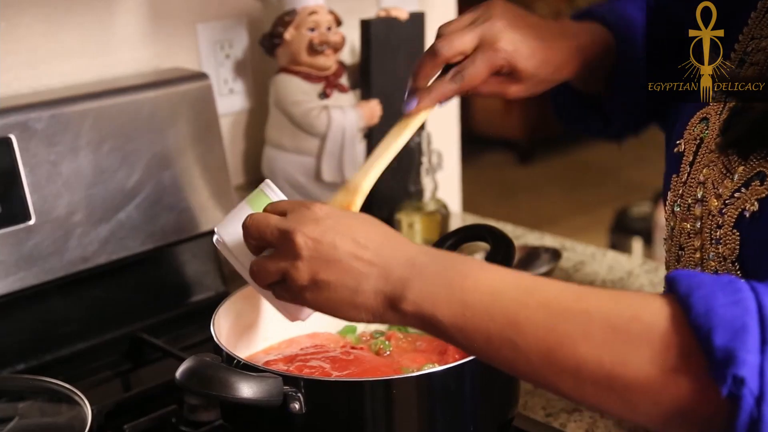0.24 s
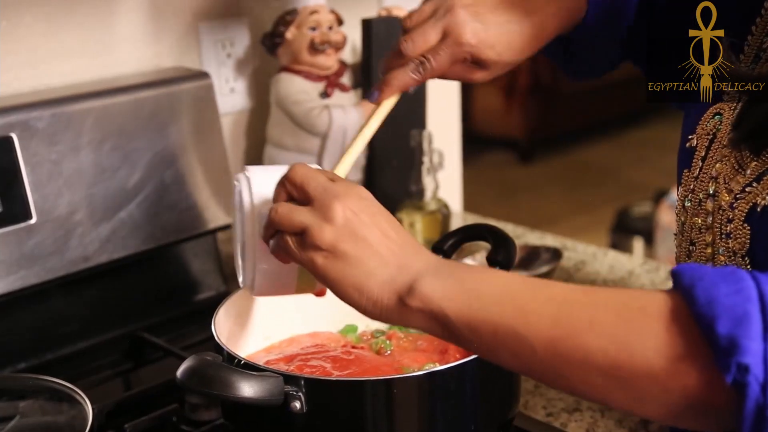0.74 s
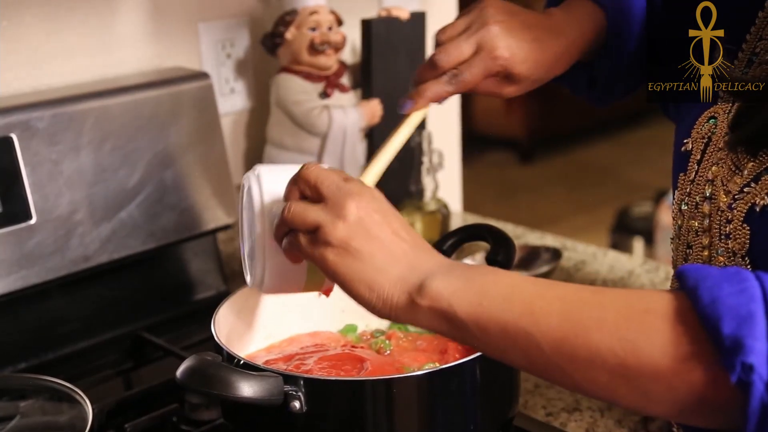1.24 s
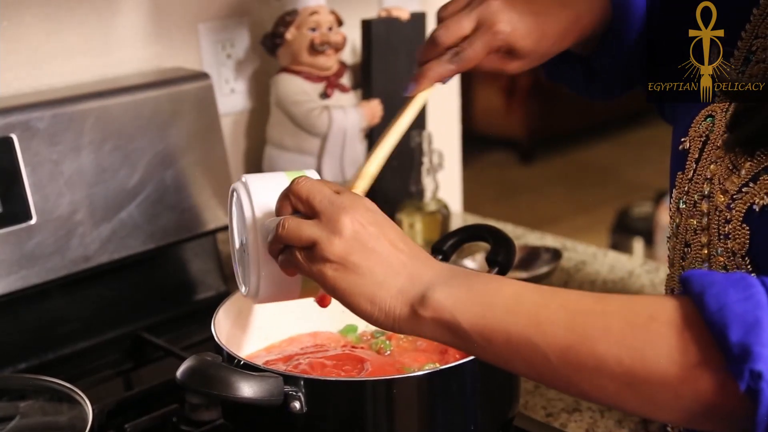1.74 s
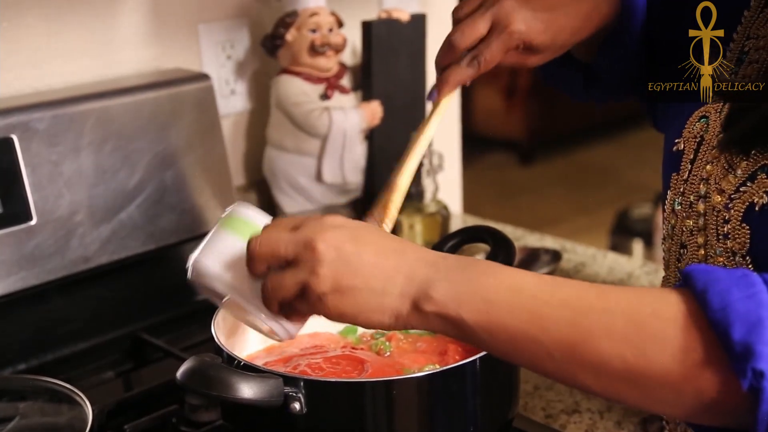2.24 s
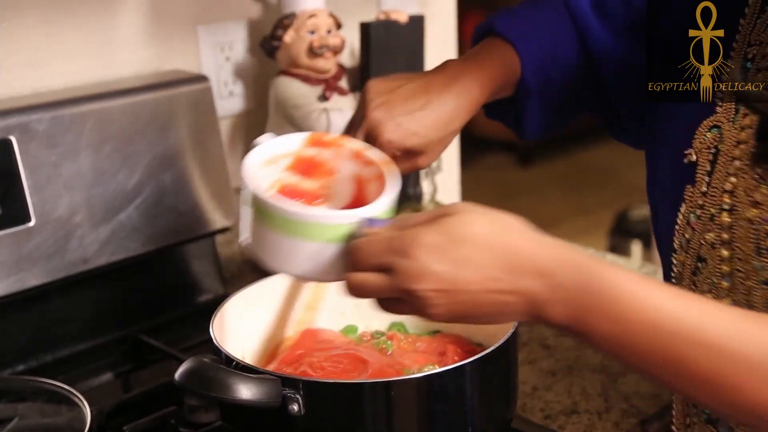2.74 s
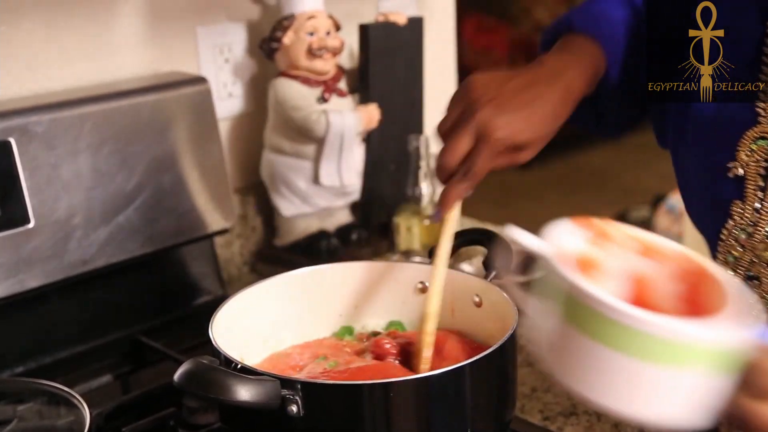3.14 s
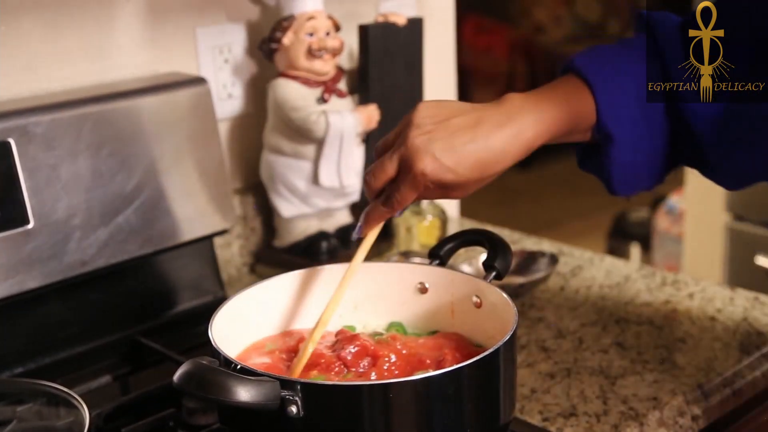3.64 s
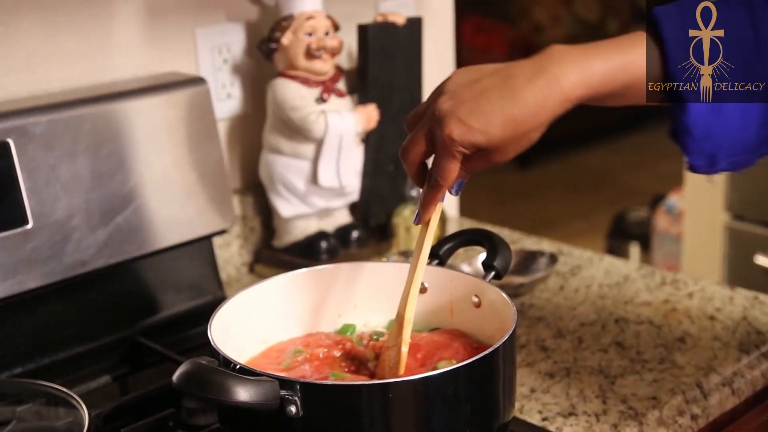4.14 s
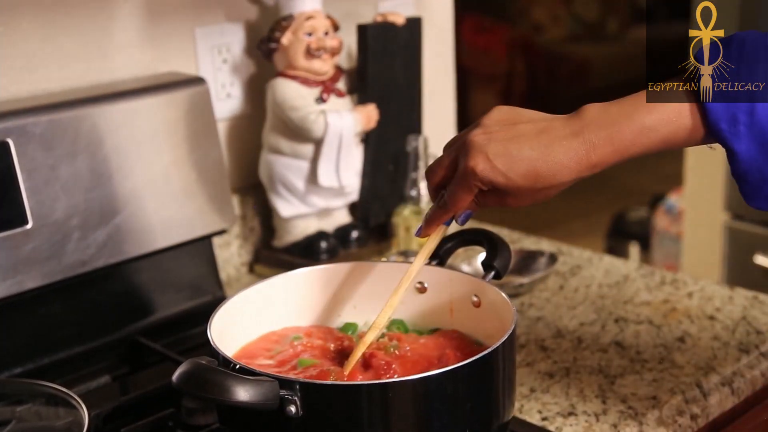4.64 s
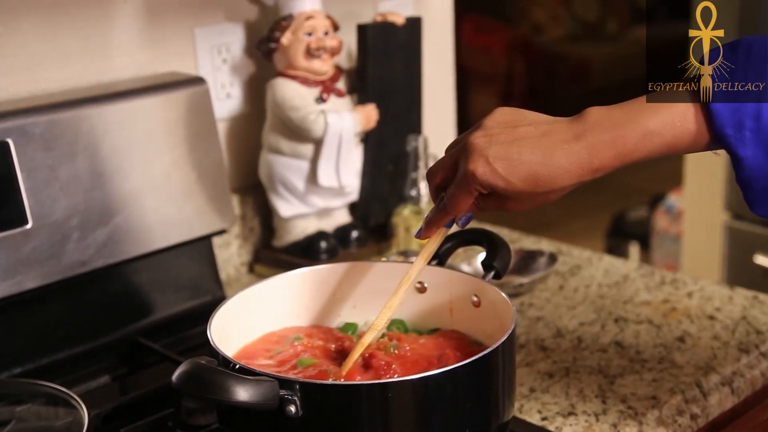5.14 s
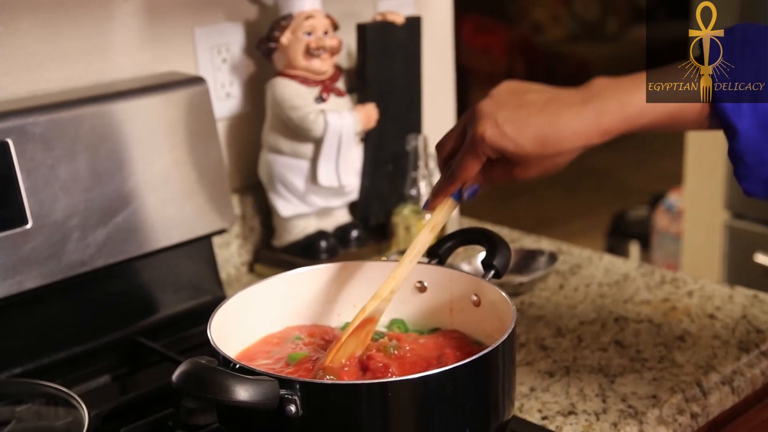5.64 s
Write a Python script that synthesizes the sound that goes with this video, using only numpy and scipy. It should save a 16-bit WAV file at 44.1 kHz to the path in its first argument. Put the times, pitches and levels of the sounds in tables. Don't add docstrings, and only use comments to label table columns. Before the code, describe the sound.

In a kitchen, a wooden spoon raps a cup loudly, bumps softly through sauce in a sizzling pot, and metalware falls twice, ringing.

```python
import sys
import numpy as np
from scipy import signal
from scipy.fft import rfft, irfft
from scipy.io import wavfile

SR = 44100
rng = np.random.default_rng(int(sys.argv[2]) if len(sys.argv) > 2 else 0)


def pcm_store(signal):
    levels = np.round(np.clip(np.atleast_2d(signal), -1, 1) * 32767)
    wavfile.write(sys.argv[1], SR, levels.astype(np.int16).T)


def linear_from_db(decibels):
    return 10 ** (np.asarray(decibels, float) / 20)


N = 260315

# t/s, cavity peak level/dB, cavity f/Hz, wall level/dB, hardness/dB
CUP_TAPS = [(0.0044, -27.5, 1670, -34, 6.5), (0.0621, -19, 1880, -28, -16.5), (0.066, -20, 1900, -37.5, 13),
            (0.329, -20, 1780, -24, -5.5), (0.359, -45, 1930, -41, -15), (0.408, -28, 1630, -19, -11.5),
            (0.6543, -25, 1540, -41.5, -14), (1.0969, -3.5, 1900, -19.5, 7.5), (1.1991, 2, 1778, -15, 7),
            (1.5272, 0.5, 1774, -19.5, 3.5), (1.8475, -37, 1770, -48.5, -11), (2.0558, -6, 1813, -21.5, -3),
            (2.747, -32.5, 1390, -38, -3), (2.829, -29, 1570, -34.5, -2.5)]
# f/Hz, loosely gripped level/dB, T60/s, pressed on the spoon level/dB, T60/s
CUP_WALL = [(457, -9.5, 0.0034, -10, 0.0074), (643, -16, 0.012, -17, 0.011), (1048, -9.5, 0.013, -1, 0.013),
            (1360, -14.5, 0.011, -12, .015), (2242, 4, 0.019, -1, 0.019), (2470, -7, 0.035, -23, 0.0082),
            (2774, -3, 0.0082, -14.5, 0.017), (3166, -11, 0.0093, -8.5, 0.008),
            (3980, -7.5, 0.021, -16, 0.0091), (4440, -15, 0.028, -23, 0.0066),
            (5330, -11, 0.011, -10, 0.0072), (6390, -6, 0.0039, -26.5, 0.0021),
            (9000, -14, 0.0081, -22, .006)]
HARDNESS_SHARE = [-0.93, .05, 1.1]
# peak t/s, level/dB, rise/(dB/s), fall/(dB/s)
SCRAPE = [
    (0.001, -22.5, 600, 650),
    (.07, -37, 30, 290),
    (.335, -48, 700, 132),
    (.415, -39, 597, 328),
]
# t/s, peak level/dB, f/Hz
BLOW_NOTES = [(0.361, -35, 6500), (0.6545, -28, 1920), (1.0954, -32, 9320), (1.0959, -34.5, 1500),
              (1.0968, -7.5, 2060), (1.1992, -7.5, 5350), (1.525, -21.5, 1077), (1.5274, -12, 3003),
              (1.5279, -25, 6800), (2.0547, -23, 2670), (2.6279, -27, 7900), (3.876, -50.5, 273)]
CAVITY_T60_S, PRESSED_S = 0.0061, 0.5

# t/s, peak level/dB, depth in the sauce/1
POT_BUMPS = [(2.627, -20.5, 0.05), (2.66, -35, 0.1), (2.761, -36, 0.29), (2.924, -42, 0.18),
             (3.153, -21, 0.78), (3.179, -40, .7), (3.622, -22, 0.58), (3.644, -22.5, 0.68),
             (3.6, -63, .05), (3.689, -42, 0.7), (3.876, -49, 0.7), (4.03, -52, 0.03), (4.065, -23.5, 1.15),
             (4.079, -51, .9), (4.109, -40.5, 0.46)]
# f/Hz, level/dB, T60/s
POT_WALL = [(244, -16, 0.015), (374, -14, 0.059), (533, -4.5, 0.0085), (703, -11.5, 0.12),
            (1023, -6.5, 0.0041), (1397, 0, 0.0087), (1620, 4, 0.009), (2116, 4, 0.027), (2650, 7.5, 0.015),
            (3060, -3, 0.017), (4100, -2, 0.013), (4890, -16, 0.025), (5300, -9.5, 0.013),
            (6630, -12, 0.014)]
RIM_DB = [-0.5, 3, -3.5, 5]
SAUCE_LOSS_DB = [0.1, 28, 48, 84]
LONGEST_POT_T60_S = 0.028

# t/s, knock peak level/dB, ring level/dB, high ring level/dB
CLATTER = [(4.614, -4, -7.5, -32), (4.662, -13, -15, -42), (4.683, -15.5, -27, -54.5),
           (4.694, -27, -44, -51), (4.71, -15.5, -49, -61), (4.735, -19, -40.5, -65),
           (4.839, -32, -51.5, -74.5), (4.936, -29.5, -54, -72), (4.944, -25.5, -43.5, -63),
           (4.97, -25.5, -33, -60), (4.981, -12.5, -21.5, -42), (4.999, -13, -8, -28),
           (5.007, -19, -39.5, -42), (5.016, -14.5, -30.5, -25.5), (5.099, -56, -47, -45.5)]
# f/Hz, first level/dB, T60/s, second level/dB, T60/s
LOW_RING = [(1997, -2.5, 0.27, 2, 0.068), (1872, -16, 0.26, -4.5, 0.032), (2002, -27, .2, -17, 0.42),
            (2410, -19, 0.13, -17, 0.15), (2500, -26.5, 0.18, -20.5, 0.18)]
# f/Hz, first level/dB, T60/s, second level/dB, T60/s
HIGH_RING = [(2918, -10, 0.18, -18.5, 0.11), (4033, -1.5, 0.24, -10, 0.37), (4530, -7, 0.19, -9.5, .19),
             (5280, -19, 0.15, -19.5, 0.26), (7450, -34, 0.075, -22, 0.13), (8740, -9, 0.072, -22, 0.12),
             (8880, -20.5, .2, -19.5, 0.2), (11580, -34, .15, -30, 0.15), (12410, -30.5, .2, -41, .2),
             (15340, -35, .1, -22, .13)]
# f/Hz, level/dB, T60/s
HOB_TOP = [(414, -27.5, 0.15), (662, -17.5, 0.074), (969, -4.5, 0.017), (1097, -5.5, 0.029),
           (1178, -8, 0.046), (1390, 3, 0.0086), (1654, -1, 0.024), (2165, -5.5, 0.01),
           (2750, -17.5, 0.011), (3270, -24, 0.013), (3950, -22.5, 0.024), (4960, -37, 0.0073),
           (6170, -39, .008)]
# peak t/s, level/dB, rise/(dB/s), fall/(dB/s)
RATTLE = [
    (4.68, -30, 34, 130.5),
    (4.89, -44, 73, 82),
    (5.005, -28, 206, 247),
]
# f/Hz, level/dB, T60/s
THIN_SHEET = [(2830, 0, 0.015), (3620, -5, 0.015), (4760, -2, 0.0055), (5680, -9.5, 0.0096),
              (6840, -10, 0.0052)]
SECOND_FALL_S = 4.9

# t/s, hiss level/dB
SIZZLE = [(0, -55), (1.05, -56), (1.3, -58), (2.3, -55.5), (2.8, -54), (3.4, -56.5), (3.9, -59.5),
          (4.4, -63), (4.8, -67.5), (5.2, -64), (5.9, -62)]
# t/s, peak level/dB, f/Hz
POPS = [(0.2345, -36, 9900), (0.261, -36, 9810), (0.5123, -37, 6630), (0.707, -40, 5800),
        (0.7552, -41, 5950), (0.8125, -45, 6940), (0.878, -33, 9800), (0.9263, -34.5, 9800),
        (0.9413, -48, 5320), (0.9857, -34, 5030), (0.9862, -32, 11000), (1.0488, -31.5, 9900),
        (1.3996, -36.5, 7400), (1.7072, -37, 5120), (1.723, -33, 8080), (1.7363, -29.5, 11300),
        (1.774, -34, 11000), (1.804, -37, 9400), (2.0987, -36, 5280), (2.134, -37, 5600),
        (2.2115, -35, 10700), (2.2609, -35, 9000), (2.2986, -36, 9900), (2.3475, -35, 5400),
        (2.7254, -34.5, 8100), (2.7961, -33, 10740), (2.9485, -36.5, 5220), (3.1978, -36, 9500)]
# t/s, peak level/dB, f/Hz
BUBBLES = [
    (3.6993, -26, 4530),
    (4.1225, -39, 2740),
    (5.3031, -31.5, 2980),
]
# f/Hz, level per Hz/dB
HISS = [(120, -16.5), (200, -0.5), (245, -8), (347, 1), (401, -5), (735, 1), (933, -4.5), (1450, 0),
        (3370, -5.5), (5230, -9), (9750, -12.5), (14300, -15), (16000, -23.5)]
# peak t/s, level/dB, rise/(dB/s), fall/(dB/s)
STIR = [
    (2.8, -52, 40, 12),
    (3.4, -51, 6, 34),
]
# f/Hz, bandwidth/Hz
POT_MOUTH = (1480, 230)
MOUTH_DB, MOUTH_FOLLOWS = -55.5, 1.1
SMALL_POPS_PER_S = 170

# t/s, f/Hz, level/dB
HUM = [
    (4.25, 1093, -79),
    (4.45, 1050, -70),
    (4.612, 960, -59.5),
]
# t/s, peak level/dB, f/Hz
THUMPS = [(2.85, -40, 90), (3.261, -45, 118), (3.399, -53, 61.9), (3.5, -60, 158), (4.616, -39.5, 151),
          (4.997, -46, 113)]
# f/Hz, level per Hz/dB
AIR = [(12, -45.5), (20, -13), (113, -0.5), (367, -6.5), (485, -0.5), (718, -12.5), (802, -1.5),
       (873, -11.5), (1030, -1.5), (1220, -6), (1440, -3), (3530, -12.5), (9670, -16), (16000, -13)]
AIR_DB = -59
# f/Hz, level per Hz/dB
SELF_NOISE = [(12, -15.5), (20, -23), (53, 4), (123, 1), (590, 1), (1370, -5.5), (3840, -1.5),
              (14700, -1.5), (16000, -3.5)]
# f/Hz, T60/s
ROOM_T60 = [(200, 0.15), (700, 0.61), (1800, 0.38), (4000, 0.21), (12000, 0.32)]


def cup():
    s, peak, hz, wall_db, hardness = np.transpose(CUP_TAPS)
    groups = wall_db + np.outer(HARDNESS_SHARE, hardness)
    cavity = blips(zip(s, peak, hz), 0 * s + CAVITY_T60_S, gain_db=11.5, sharpness=10.9)
    loose, pressed = [0, 1, 2], [0, 3, 4]
    wall = 0
    for grip, columns in ((s < PRESSED_S, loose), (s >= PRESSED_S, pressed)):
        modes = np.array(CUP_WALL)[:, columns]
        wall = wall + linear_from_db(2) * strike(s[grip], groups[:, grip], [1700, 2800], modes, spread_db=2)
    blow_notes = blips(BLOW_NOTES, ring_times(BLOW_NOTES, 22), gain_db=2)
    scrape = chatter(SCRAPE, (0, 0.55), np.array(CUP_WALL)[3:, :3], per_s=840, longest_s=0.04)
    tail = linear_from_db(-11.5) * dying_noise(wall, share=0.14, start_s=0.0033)
    return cavity + wall + tail + scrape + blow_notes


def pot():
    s, peak_db, depth = np.transpose(POT_BUMPS)
    levels = peak_db + np.c_[RIM_DB] - np.outer(SAUCE_LOSS_DB, depth)
    modes = [(hz, db, min(t60, LONGEST_POT_T60_S)) for hz, db, t60 in POT_WALL]
    knock = strike(s, levels, [1100, 1850, 3500], modes, spread_db=3)
    return knock + linear_from_db(-0.5) * dying_noise(knock, share=0.285, start_s=0.00037)


def clatter():
    s, knock_db, ring_db, high_db = np.transpose(CLATTER)
    free, held = [0, 1, 2], [0, 3, 4]
    rings = 0
    for fall, columns in ((s < SECOND_FALL_S, free), (s >= SECOND_FALL_S, held)):
        low_modes, high_modes = np.array(LOW_RING)[:, columns], np.array(HIGH_RING)[:, columns]
        rings = rings + strike(s[fall], [ring_db[fall]], [], low_modes, spread_db=1.5)
        rings = rings + strike(s[fall], [high_db[fall]], [], high_modes, spread_db=3)
    knocks = strike(s, [knock_db - 6], [], HOB_TOP, spread_db=3)
    knocks = knocks + chatter(RATTLE, (4.62, 5.24), HOB_TOP[:9], per_s=600, longest_s=0.042)
    return rings + knocks + linear_from_db(-15) * dying_noise(knocks, share=0.53, start_s=0.0033)


def clang():
    s, _, _, high_db = np.transpose(CLATTER)
    crack = strike(s, [high_db + 2], [], THIN_SHEET, spread_db=3)
    return linear_from_db(-1) * crack + linear_from_db(1.5) * dying_noise(crack, share=0.87, start_s=0.0012)


def sizzle():
    hiss_db, = in_time(SIZZLE)
    mouth_db = np.maximum(MOUTH_DB + MOUTH_FOLLOWS * (hiss_db + 57), swells(STIR))
    fizz = coloured(HISS)
    treble = signal.butter(2, 6500, "high", fs=SR, output="sos")
    top = signal.sosfilt(treble, coloured(HISS))
    sway = drift(9)
    puffs = 4 * drift(30) + 3 * drift(90)
    fizz = linear_from_db(hiss_db + 2 + sway) * fizz + linear_from_db(hiss_db - 11.5 + puffs) * top

    hz, width = POT_MOUTH
    sung = rms_one(ring(rng.standard_normal(N), hz, 2.1 / width))
    mouth = linear_from_db(mouth_db - 8 + 2 * drift(8.8)) * sung

    born = rng.random(N) < SMALL_POPS_PER_S * linear_from_db(7 * drift(40)) / SR
    born = born * linear_from_db(4.83 * rng.exponential(1, N).clip(0, 3.2))
    pitches, dealt = np.geomspace(4500, 14000, 8), rng.integers(0, 8, N)
    crackle = sum(ring(born * (dealt == k), f, 4 / f, sharpness=0.71) for k, f in enumerate(pitches))
    pops = linear_from_db(hiss_db + 14) * crackle
    pops = pops + blips(POPS, ring_times(POPS, 3.7), gain_db=10.5, sharpness=0.89)
    bubbles = blips(BUBBLES, ring_times(BUBBLES, 4.5), gain_db=5)
    return fizz + mouth, spatter(pops, length_s=0.016) + bubbles


def spatter(pops, length_s):
    t = np.arange(600) / SR
    burst = rng.standard_normal(len(t)) * linear_from_db(-60 * t / length_s)
    burst = irfft(np.exp(1j * np.angle(rfft(burst))), len(t))
    return signal.fftconvolve(pops, burst / np.sqrt(np.sum(burst ** 2)))[:N]


def hum():
    hz, level = in_time(HUM)
    sounding = (np.arange(N) > HUM[0][0] * SR) & (np.arange(N) < HUM[-1][0] * SR)
    return sounding * linear_from_db(level + 4.5) * np.sin(2 * np.pi * np.cumsum(hz) / SR)


def thumps():
    return blips(THUMPS, ring_times(THUMPS, 1.8), gain_db=7, sharpness=0.65)


def kitchen(wet):
    return dying_noise(wet, share=1, start_s=0.0056)


def air():
    return linear_from_db(AIR_DB + 1.83) * coloured(AIR)


def self_noise():
    return linear_from_db(AIR_DB - 5) * coloured(SELF_NOISE)


def ring(clicks, hz, t60, sharpness=2.02):
    r, w = linear_from_db(-60 / (t60 * SR)), 2 * np.pi * min(hz, 0.45 * SR) / SR
    broad = np.exp(-w / 2 / sharpness)
    zeros = np.array([1, 0, -1]) * (1 - broad ** 2) / 2
    push = signal.lfilter(zeros, [1, -2 * broad * np.cos(w), broad ** 2], clicks + 1e-18)
    return signal.lfilter([0, np.sin(w)], [1, -2 * r * np.cos(w), r * r], push)


def strike(times, group_db, edges, modes, spread_db):
    chance = rng.standard_normal((len(times), len(modes)))
    first, last = int(min(times) * SR), int(max(times) * SR) + SR // 2
    out = np.zeros(N)
    for k, (hz, db, t60) in enumerate(modes):
        level = group_db[np.searchsorted(edges, hz)] + db + spread_db * chance[:, k]
        clicks = clicks_at(times, level)
        out[first:last] += (-1) ** k * ring(clicks[first:last], hz, t60)
    return out


def clicks_at(times, db):
    out = np.zeros(N)
    np.add.at(out, np.round(np.asarray(times) * SR).astype(int), linear_from_db(db))
    return out


def blips(rows, t60s, gain_db, sharpness=1.6):
    out, click = np.zeros(N + 4096), np.eye(1, 4096)[0]
    for (s, db, hz), t60 in zip(rows, t60s):
        out[round(s * SR):][:4096] += linear_from_db(db + gain_db) * ring(click, hz, t60, sharpness)
    return out[:N]


def ring_times(rows, cycles):
    return cycles / np.array(rows)[:, 2]


def chatter(strokes, span_s, modes, per_s, longest_s):
    span = slice(int(span_s[0] * SR), int(span_s[1] * SR))
    sizes = linear_from_db(3.5 * rng.exponential(1, N).clip(0, 4)) * rng.choice([-1, 1], N)
    clicks = ((rng.random(N) < per_s / SR) * sizes)[span]
    body = sum(linear_from_db(db) * ring(clicks, hz, min(t60, longest_s)) for hz, db, t60 in modes)
    out = np.zeros(N)
    out[span] = rms_one(body)
    return linear_from_db(swells(strokes)) * out


def dying_noise(x, share, start_s):
    t = np.arange(SR // 2) / SR
    edges = 100 * 2 ** np.arange(0, 7.6, 0.5)
    white = rng.standard_normal((2, SR // 2))
    tail = 0
    for k, (low, high) in enumerate(zip(edges, edges[1:])):
        band_filter = signal.butter(2, [low, high], "band", fs=SR, output="sos")
        band = signal.sosfilt(band_filter, white[k % 2])
        tail = tail + band * linear_from_db(-60 * t / share / at_hz(ROOM_T60, np.sqrt(low * high)))
    tail = tail * np.clip(t / start_s - 1, 0, 1)
    return signal.fftconvolve(x, tail / np.sqrt(np.sum(tail ** 2)))[:N]


def swells(rows):
    t = np.arange(N) / SR
    levels = [db - np.maximum(rise * (s - t), fall * (t - s)) for s, db, rise, fall in rows]
    return np.max(levels, axis=0)


def coloured(spectrum):
    hz = np.maximum(np.fft.rfftfreq(N, 1 / SR), 5)
    return rms_one(irfft(rfft(rng.standard_normal(N)) * linear_from_db(at_hz(spectrum, hz)), N))


def drift(rate):
    points = rng.standard_normal(800)
    return np.interp(np.arange(N) / SR * rate, np.arange(800), points)


def rms_one(x):
    return x / np.sqrt(np.mean(x ** 2) + 1e-20)


def at_hz(points, hz):
    return np.interp(np.log(hz), np.log(np.array(points)[:, 0]), np.array(points)[:, 1])


def in_time(rows):
    s, *columns = np.transpose(rows)
    return [np.interp(np.arange(N) / SR, s, c) for c in columns]


def scene():
    taps, (steady, pops), bumps, metal = cup(), sizzle(), pot(), clatter()
    wet = linear_from_db(-19.5) * taps + linear_from_db(-15.5) * bumps + linear_from_db(-15.5) * metal + linear_from_db(-7.5) * pops
    mid = taps + bumps + metal + clang() + pops + steady
    mid = mid + kitchen(wet) + hum() + thumps() + air()
    side = self_noise()
    return np.array([mid + side, mid - side])


def roll_off(x):
    return signal.sosfilt(signal.butter(12, 16500, fs=SR, output="sos"), x)


def record(dry):
    top_cut = signal.cheby2(10, 50, 16300, fs=SR, output="sos")
    mix = np.clip(signal.sosfilt(top_cut, dry), -1, 1)
    return roll_off(mix)


dry = scene()
out = record(dry)
pcm_store(out)
```